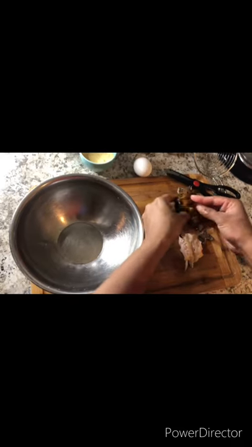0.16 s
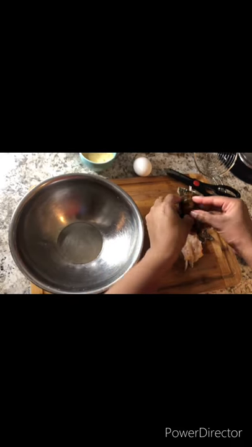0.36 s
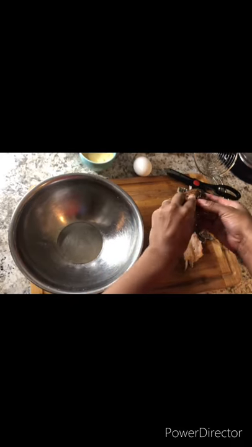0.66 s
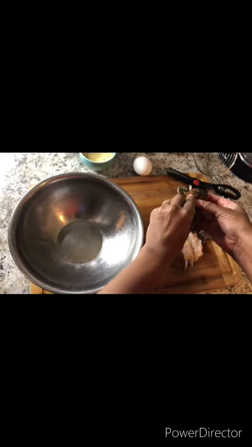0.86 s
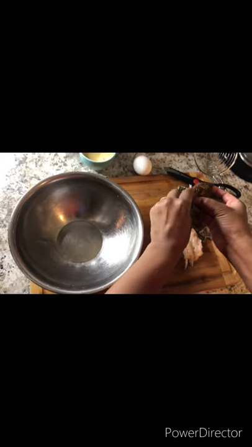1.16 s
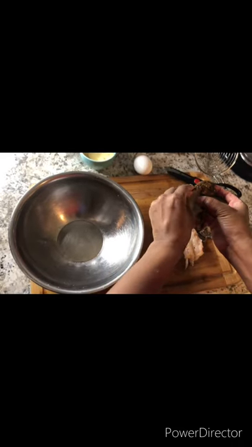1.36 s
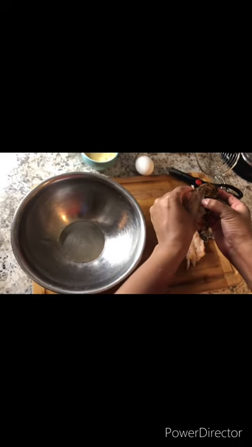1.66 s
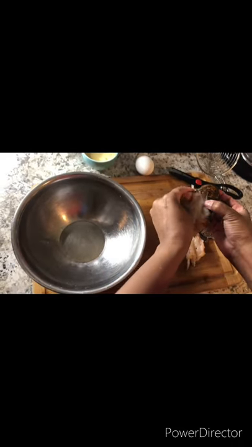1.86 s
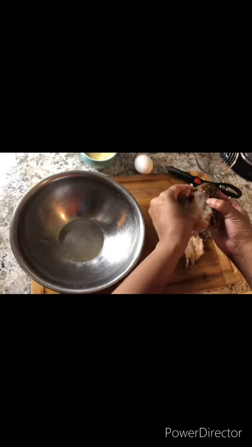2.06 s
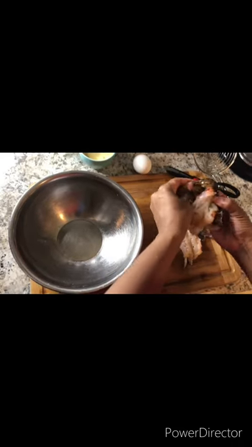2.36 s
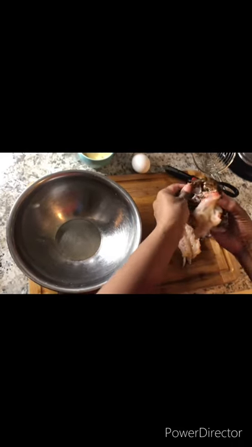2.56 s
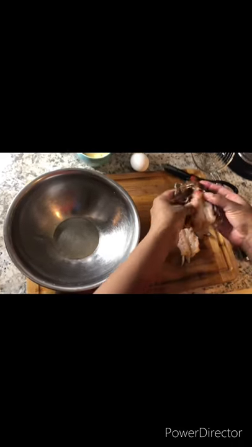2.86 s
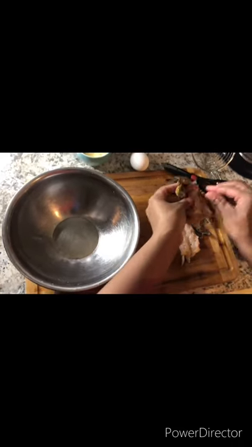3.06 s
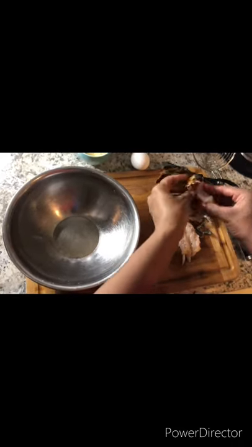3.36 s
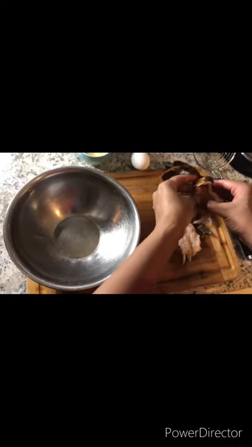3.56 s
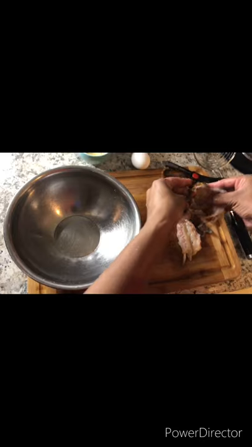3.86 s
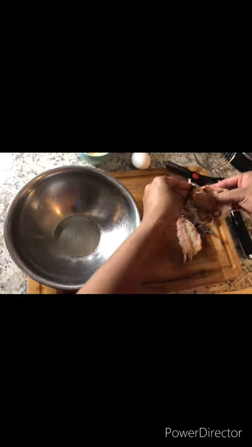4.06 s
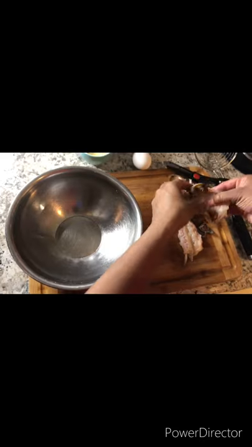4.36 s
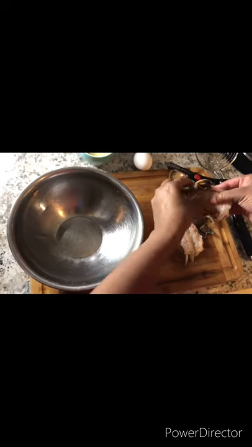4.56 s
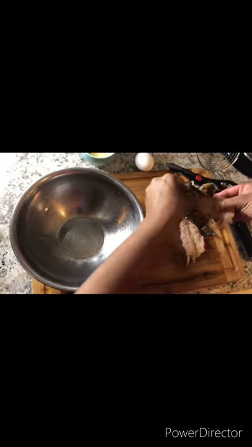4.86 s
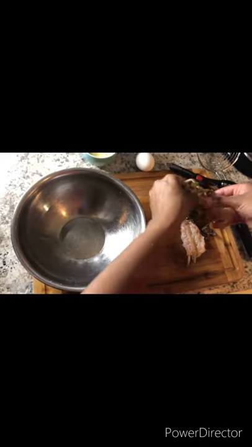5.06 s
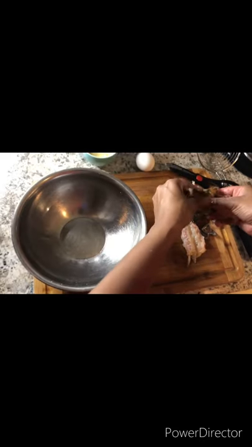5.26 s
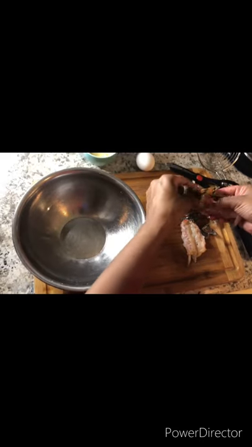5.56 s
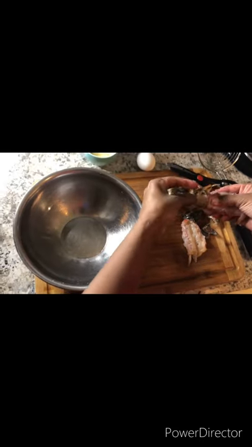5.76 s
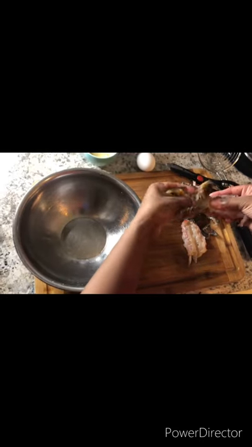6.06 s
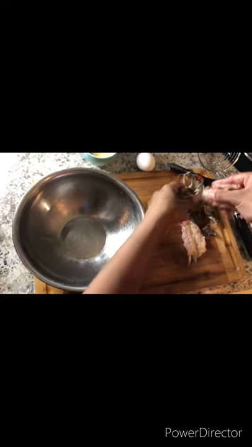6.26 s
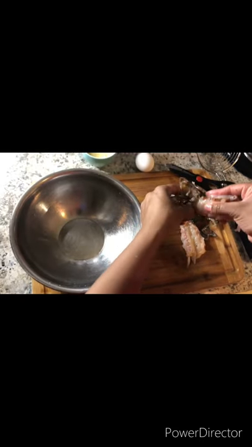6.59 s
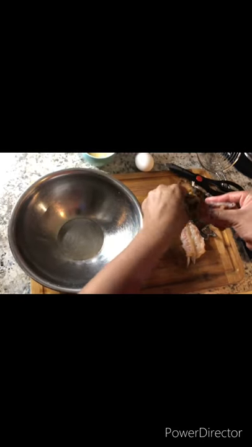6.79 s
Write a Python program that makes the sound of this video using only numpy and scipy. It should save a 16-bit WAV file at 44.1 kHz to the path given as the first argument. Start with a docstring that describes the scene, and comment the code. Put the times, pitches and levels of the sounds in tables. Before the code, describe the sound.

Crisp, brittle snaps come from a lobster shell being pulled apart by hand, heard up close with a short kitchen echo. The loudest cracks arrive in tight clusters in the first half. After that, smaller crackles and occasional snaps mix with tiny sticky ticks of flesh coming loose. A faint, steady fridge hum runs throughout.

```python
"""Cracking a lobster tail

Hands pull a hard lobster tail shell apart over a wooden board in a small tiled kitchen.
Each fracture is a bright burst of splinters a few ms long, and the flexing shell tube
gives hollow knocks. In between, shell scrapes and wet flesh peels in tiny ticks.
The room adds short reflections; a fridge and its fan hum underneath."""
import sys
import numpy as np
from scipy import signal
from scipy.fft import rfft, irfft
from scipy.io import wavfile
from scipy.ndimage import uniform_filter1d

SR = 44100
rng = np.random.default_rng(int(sys.argv[2]) if len(sys.argv) > 2 else 0)


def wav_out(sig):
    """Save sig, one row per channel (or a flat mono array), as 16-bit PCM at SR to the path in sys.argv[1]."""
    wavfile.write(sys.argv[1], SR, np.round(np.clip(np.atleast_2d(sig).T, -1, 1) * 32767).astype(np.int16))


N = 305613

# featured shell cracks and the quick room echoes of the loudest ones:
# (time [s], relative level [dB], splinter pitch [Hz], wall ring vs splinters [dB])
CRACKS_AND_ECHOES = [(0.061, -26, 5800, -11), (0.4213, -32, 5330, -25), (0.526, -32, 7000, 0),
                     (0.5735, -24, 5360, -12), (0.7404, -6.5, 7800, -16.5), (0.752, -23, 6100, -11),
                     (0.775, -13, 6400, -12), (0.9238, -28, 5200, -6), (0.9378, -25, 8100, -19),
                     (0.9735, -14.5, 7700, -21), (0.993, -22, 8300, -17), (1.0467, -11, 8360, -37),
                     (1.0653, -10.5, 5700, -21), (1.0763, -3, 8800, -24), (1.101, -4.5, 9500, -27),
                     (1.113, -20, 6700, -23), (1.136, -11, 9900, -31), (1.1504, -5, 8850, -18),
                     (1.1726, -12, 7300, -9), (1.1768, -1.5, 9600, -38), (1.2086, 4, 8440, -23),
                     (1.212, 14, 5900, -11), (1.239, 6, 6900, -22), (1.2467, 14, 9500, -20),
                     (1.258, 9.5, 8040, -31), (1.373, -18, 10500, -7), (1.383, -14.5, 8500, -19),
                     (1.423, -17, 9500, -8), (1.444, -18.5, 9400, -21), (1.5933, 14.5, 9150, -19),
                     (1.762, 4, 10700, -17), (1.778, -20, 7360, 0), (1.797, -6, 4500, -14),
                     (1.8096, 14, 9800, -14.5), (1.8689, 1, 7540, -12), (1.889, -10, 9300, -25),
                     (1.904, 1.5, 10100, -10.5), (1.9099, 14.5, 11400, -26), (1.9295, 1.5, 10330, -14.5),
                     (2.0344, -8, 9100, -12), (2.0804, -12, 9800, -21), (2.0943, -2, 7650, -2.5),
                     (2.105, -15, 8800, -12), (2.1113, 13, 9000, -7.5), (2.122, -1, 6500, -10),
                     (2.1336, 9.5, 7400, -30), (2.1443, -17, 6700, -11), (2.3487, -26, 7200, -19),
                     (2.361, -6.5, 8950, -22), (2.3855, -5, 7400, -11), (2.4112, 7.5, 10000, -18.5),
                     (2.4173, -6.5, 7460, -8), (2.4335, 3, 7500, -12.5), (2.442, -17, 6900, -15),
                     (2.543, 0.5, 7000, -11.5), (2.5442, -4, 7900, -12.5), (2.5525, -11, 9900, -44),
                     (2.591, -19.5, 5940, -13), (2.7978, -25, 9800, -28), (2.846, -24.5, 6000, -23),
                     (2.9962, -19, 8060, -6.5), (3.0664, -28, 9000, -2.5), (3.1462, -27, 5300, -30),
                     (3.2223, -27, 11400, -33), (3.2575, -18.5, 8760, -32), (3.3318, -21, 6400, -20),
                     (3.3469, -7.5, 6860, -18), (3.416, -25, 6300, -25), (3.4939, -23.5, 7350, -20),
                     (3.5665, -16, 5600, -15), (3.5881, -14, 5450, -27), (3.749, -20.5, 5300, -19),
                     (3.803, -31, 10000, -18), (3.8272, -14, 4700, -8), (3.8492, -22, 9500, -18),
                     (3.8614, -4, 6500, 0), (3.8634, -1, 6640, -22), (3.865, -7, 6370, -31),
                     (3.877, -10, 6200, -25), (4.0281, -28, 6600, -21), (4.1585, -9, 7500, -11),
                     (4.1954, -10, 6000, -12.5), (4.1955, -6, 13000, -27), (4.2138, -10, 5140, -34),
                     (4.3787, -25.5, 7150, -17), (4.4023, -22, 6450, -10), (4.4237, -22.5, 6700, -11.5),
                     (4.6181, -24, 5500, -16.5), (4.642, -25, 5260, -16), (4.6875, -8.5, 5400, -3.5),
                     (4.728, -22, 4400, -2), (4.757, -20, 8000, -5), (4.761, -17.5, 5380, -4),
                     (4.988, -21.5, 5500, -27), (5.0005, -23.5, 9400, -19.5), (5.2, -24.5, 11200, -32),
                     (5.2295, -20, 5500, -7), (5.2615, -15, 6140, -5), (5.3544, -23, 9400, -22),
                     (5.3914, -24.5, 11800, -18), (5.44, -26, 9530, -6.5), (5.7281, -28, 8500, -28.5),
                     (5.812, -15.5, 6940, -14), (5.856, -23, 9700, -8), (5.924, -28, 8960, -35),
                     (6.177, -23.5, 4700, -8), (6.491, -2.5, 5500, -20), (6.4915, -7.5, 12000, -28.5),
                     (6.553, -27, 4700, 3), (6.5643, -11.5, 6340, -10), (6.697, -24, 5200, -13.5)]
# hollow knocks of the flexing shell tube: (time [s], relative level [dB], pitch [Hz])
TUBE_KNOCKS = [(1.593, -32.5, 520), (1.869, -40, 550), (1.91, -36, 526), (2.112, -25, 460),
               (2.121, -30.5, 404), (2.41, -39.5, 490), (2.433, -37.5, 450), (2.543, -38.5, 700),
               (2.612, -40, 398), (3.348, -44, 641), (3.587, -33.5, 663), (3.861, -25, 412),
               (4.194, -39, 502), (6.491, -35, 717), (6.564, -35.5, 466)]
# fingers working the shell: (time [s], rustle level [dB], wet layer vs scrape [dB])
FINGER_WORK = [(0.1, -88, -12), (0.34, -71.5, -6), (0.64, -72, 0), (0.8, -69, -4), (1.0, -73, 0),
               (1.3, -69.5, 2.5), (2.66, -73, 1.5), (3.0, -76, 4), (3.79, -82, 4), (3.95, -75, 1.5),
               (4.51, -77, -5.5), (4.7, -62.5, -8), (4.86, -68.5, -4), (5.1, -71, -2.5),
               (5.67, -75.5, -1.5), (6.25, -76.5, 0), (6.69, -74.5, -2), (6.93, -78.5, -6)]
# brief rips and squelches: (start [s], length [s], level [dB])
RIPS = [(1.209, .052, -28), (1.757, 0.027, -47), (2.11, .02, -40), (2.83, 0.025, -64), (3.34, 0.073, -58.5),
        (3.681, 0.074, -65.5), (4.398, 0.038, -63.5), (4.622, 0.037, -60.5), (4.685, .107, -58),
        (4.985, 0.067, -62), (5.254, .033, -58), (5.647, 0.022, -58.5), (6.24, 0.034, -68),
        (6.668, 0.037, -63), (6.811, .045, -64)]
# resonances of scraping shell: (centre [Hz], width [Hz], relative level [dB])
SCRAPE_BANDS = [(3050, 1800, -6.5), (4360, 1750, -5.5), (5650, 1200, -4.5)]
# resonances of sticky flesh peeling off: (centre [Hz], width [Hz], relative level [dB])
FLESH_BANDS = [(8200, 3000, -7), (11000, 2100, -7), (13900, 3500, -11.5)]
# diffuse tail of the kitchen: (band [Hz], time to fall 60 dB [s], level [dB])
REVERB_BANDS = [(715, 0.036, -50.5), (1390, 0.34, -45.5), (3280, 0.37, -44.5), (6340, 0.3, -42.5),
                (11100, 0.2, -37.5)]
# reflections off bowl, wall, worktop and cupboard: (delay [ms], smear [ms], level [dB])
REFLECTIONS = [(3.2, 0.54, -7.5), (8.5, 1.5, -14), (11.0, 0.5, -22.5), (16.0, 3.3, -20)]
# compressor and fan tones: (pitch [Hz], rms level [dB], waver [dB])
FRIDGE_TONES = [(53, -77.5, -1), (57.2, -72.5, -3), (120.2, -63.5, 0), (168.5, -63, 2.5),
                (213.2, -52.5, 0.3), (255, -59, 3.5), (344.5, -66.5, 4), (511, -70.5, 0), (1484, -77, 2),
                (1543, -80.5, 4.5)]
# spectrum of the room's air noise: (frequency [Hz], relative level [dB])
AIR_SPECTRUM = [(30, -44), (60, -15), (100, -21), (170, -13.5), (230, -5), (300, -10.5), (390, -15),
                (500, -10.5), (750, -21), (1100, -26), (1500, -27), (2800, -37), (6100, -36), (15000, -49)]

WALL_HZ, WALL_OCTAVES = 2950, 0.27  # broad ring of the shell wall
# high, thin splinters let go faster than low, thick ones: decay at a reference pitch, log-log slope
SPLINTER_MS, SPLINTER_HZ, DECAY_SLOPE = 1.4, 7010, 0.6
# bandwidth of the splinters: wider for strong breaks, never quite alike
SPREAD_OCTAVES, SPREAD_PER_DB, SPREAD_SCATTER = 0.45, 0.0022, 0.23
SNAPS_PER_S, SNAP_DB, SNAP_SCATTER_DB = 17, -32.5, 3.5
SNAP_HZ, SNAP_SCATTER_OCTAVES, SNAP_WALL_DB = 7100, 0.68, -15.5


def shell_cracks():
    """A spiky burst of splinter noise per crack or quick echo. Returns direct sound and room send."""
    size, lead = 1024, 32  # samples
    t = np.arange(size) / SR
    f = np.arange(size // 2 + 1) * SR / size + 1
    delay = np.exp(-2j * np.pi * f * lead / SR)  # leaves space for the filter's pre-ring
    direct, send = np.zeros((2, N))
    for time, db, hz, wall_db in np.concatenate([CRACKS_AND_ECHOES, faint_snaps()]):
        noise, uneven = rng.standard_normal((2, size))
        octaves = (SPREAD_OCTAVES + SPREAD_PER_DB * db) * np.exp(SPREAD_SCATTER * uneven[-1])
        splinters = bell(f, hz, octaves)
        treble_click = undb(-19.5 + 0.27 * db) * f ** 2 / (f ** 2 + 5600 ** 2)  # grows with force
        wall_ring = undb(wall_db) * bell(f, WALL_HZ, WALL_OCTAVES)
        colour = undb(db) * (splinters + treble_click + wall_ring) * delay
        decay_ms = max(SPLINTER_MS * (SPLINTER_HZ / hz) ** DECAY_SLOPE, 0.2)
        attack = 1 - np.exp(-t / 0.0002)
        decay = np.exp(-1000 * t / decay_ms) + 1.6 * np.exp(-t / 0.0003)
        spikes = undb(3 * uniform_filter1d(uneven, 8) * np.sqrt(8))  # splinters let go unevenly
        burst = attack * decay * spikes * noise
        burst /= np.linalg.norm(burst)
        start = max(time, 0.001) - lead / SR
        add(direct, start, irfft(rfft(burst) * colour))
        add(send, start, irfft(colour))
    return undb(-5) * direct, undb(-8.5) * send


def faint_snaps():
    """Small fractures at random moments, stronger as the fingers work harder; rows for shell_cracks."""
    count = int(SNAPS_PER_S * N / SR)
    times = (np.arange(count) + rng.random(count)) / SNAPS_PER_S
    level_draw, pitch_draw, wall_draw = rng.standard_normal((count, 3)).T
    work_times, work_db, _ = np.transpose(FINGER_WORK)
    effort_db = np.interp(times, work_times, work_db) + 70
    db = SNAP_DB + 0.45 * effort_db + SNAP_SCATTER_DB * level_draw
    hz = np.clip(SNAP_HZ * 2 ** (SNAP_SCATTER_OCTAVES * pitch_draw), 4000, 13000)
    return np.transpose([times, db, hz, SNAP_WALL_DB + 5 * wall_draw])


def tube_knocks():
    """The shell tube flexes: a dull pulse diving to the tube's pitch, wrapped in a puff of noise."""
    out = np.zeros(N)
    t = np.arange(1000) / SR
    for time, db, hz in TUBE_KNOCKS:
        cycles = hz * (t + 0.003 * (1 - np.exp(-t / 0.00079)))  # bending waves bring the lows late
        ring = np.sin(2 * np.pi * cycles) * (t / 0.0021) * np.exp(1 - t / 0.0012)
        puff = 1.8 * rng.standard_normal(len(t)) * np.exp(-t / 0.0021)
        add(out, time, undb(db) * (ring + puff))
    return band(out, 190, 2400)


def wet_rustle():
    """Tiny ticks under the fingers: shell scraping, wet flesh above it, both louder during a rip."""
    times, touch_db, wet_db = np.transpose(FINGER_WORK)
    t = np.arange(N) / SR
    rips = sum(undb(db) * ((t > start) & (t < start + length)) for start, length, db in RIPS)
    envelope = undb(np.interp(t, times, touch_db)) + uniform_filter1d(rips, size=400)
    scrape = grains(SCRAPE_BANDS, per_s=800, scatter_db=6, flicker_db=3)
    flesh = grains(FLESH_BANDS, per_s=640, scatter_db=6, flicker_db=4)
    return envelope * (scrape + undb(np.interp(t, times, wet_db)) * flesh)


def grains(resonances, per_s, scatter_db, flicker_db):
    """Random clicks ring each resonance; a few poke out, and each band's level flickers."""
    out = np.zeros(N)
    for hz, width, db in resonances:
        strength = undb(scatter_db * np.minimum(rng.exponential(size=N), 4))
        clicks = (rng.random(N) < per_s / SR) * strength * rng.standard_normal(N)
        ticks = unit_rms(band(clicks, hz - width / 2, hz + width / 2))
        out += undb(db + flicker_db * drift(35)) * ticks
    return out


def kitchen_reverb(send):
    """Nearby surfaces throw smeared echoes; the diffuse tail builds fast and lingers in the mids."""
    t = np.arange(SR // 2) / SR
    onset = 1 - np.exp(-(t / 0.0017) ** 2)
    response = np.zeros(len(t))
    for hz, t60, db in REVERB_BANDS:
        wash = unit_rms(band(rng.standard_normal(len(t)), hz / 1.57, hz * 1.63))
        response += undb(db) * wash * onset * undb(-60 * t / t60)
    for delay_ms, smear_ms, db in REFLECTIONS:
        age_ms = 1000 * t - delay_ms
        echo = rng.standard_normal(len(t)) * (age_ms > 0) * np.exp(-np.abs(age_ms) / smear_ms)
        response += undb(db) * echo / np.linalg.norm(echo)
    return signal.fftconvolve(send, response)[:N]


def fridge_hum():
    """Compressor and fan tones, each wavering in level and phase."""
    t = np.arange(N) / SR
    hum = np.zeros(N)
    for hz, db, waver in FRIDGE_TONES:
        amplitude = np.sqrt(2) * undb(db + waver * drift(9))
        cycles = hz * t + rng.random() + 0.04 * waver * drift(4.4)
        hum += amplitude * np.sin(2 * np.pi * cycles)
    return hum


def room_air(rms_db):
    """A steady bed of dark air noise."""
    hz, db = np.transpose(AIR_SPECTRUM)
    f = np.arange(N // 2 + 1) * SR / N + 1
    colour = undb(np.interp(np.log(f), np.log(hz), db))
    return undb(rms_db) * unit_rms(irfft(rfft(rng.standard_normal(N)) * colour, N))


def bell(f, hz, octaves):
    """Gain curve of a resonance, bell-shaped over log frequency, at rms 1."""
    return unit_rms(np.exp(-(np.log2(f / hz) / max(octaves, 0.1)) ** 2 / 4) / np.sqrt(f))


def drift(per_s):
    """Smooth random modulation: held values, slewed twice."""
    hold = int(SR / per_s)
    steps = np.repeat(rng.standard_normal(N // hold + 1), hold)
    return 0.81 * uniform_filter1d(uniform_filter1d(steps, hold), hold)[:N]


def band(x, low_hz, high_hz):
    """Causal band-pass."""
    edges = [low_hz, min(high_hz, SR / 2 - 100)]
    return signal.sosfilt(signal.butter(2, edges, "bandpass", fs=SR, output="sos"), x)


def undb(db):
    """Gain of a level in dB."""
    return 10 ** (np.asarray(db) / 20)


def unit_rms(x):
    """Scale to rms 1."""
    return x / np.sqrt(np.mean(x ** 2))


def add(track, time, sound):
    """Mix a short sound in at a time in seconds."""
    i = int(time * SR)
    track[i:i + len(sound)] += sound[:N - i]


def scene():
    """Mono mix: the shell up front, the kitchen around it, hum and air underneath."""
    cracks, crack_send = shell_cracks()
    handling = tube_knocks() + wet_rustle()
    room = kitchen_reverb(crack_send + handling)
    return (cracks + handling + room + fridge_hum() + room_air(rms_db=-55))[None]


def record(dry):
    """Soft-clip the loudest peaks, then trim the deepest bass and the very top."""
    rounded = dry / (1 + (dry / 0.9) ** 4) ** 0.25
    low_cut = signal.butter(4, 45, "highpass", fs=SR, output="sos")
    high_cut = signal.ellip(10, 0.2, 80, 15900, fs=SR, output="sos")
    return signal.sosfilt(high_cut, signal.sosfilt(low_cut, rounded))


dry = scene()
out = record(dry)
wav_out(out)
```